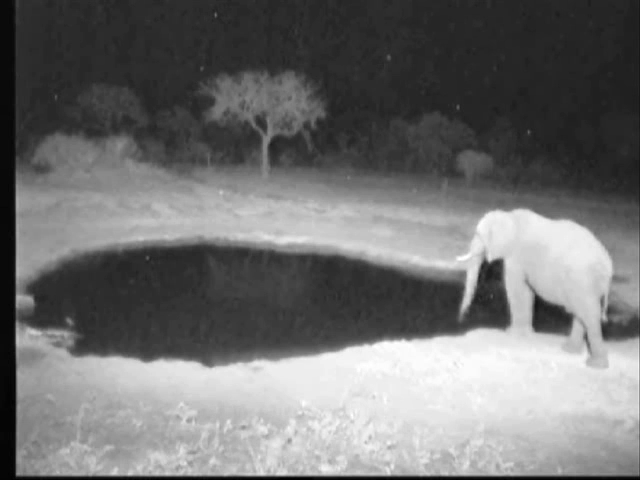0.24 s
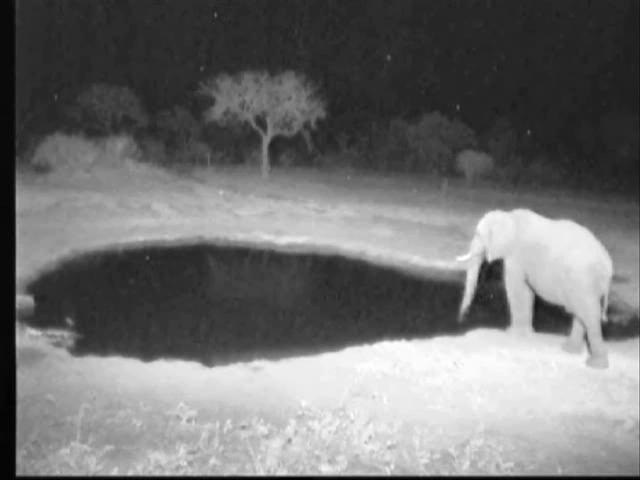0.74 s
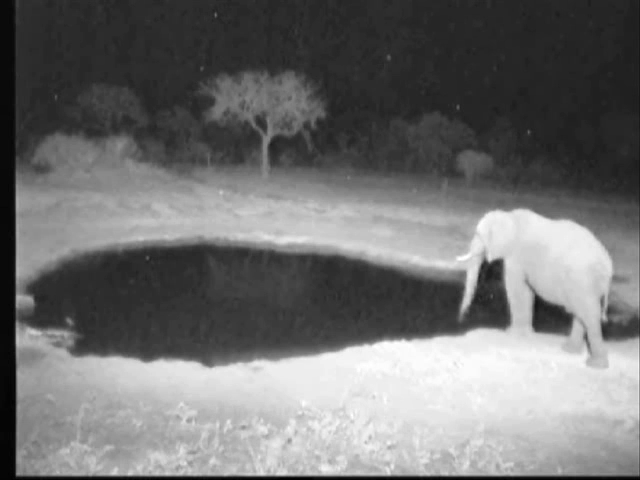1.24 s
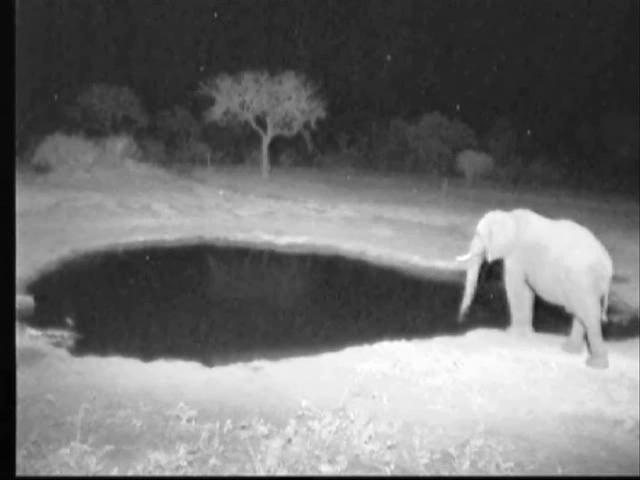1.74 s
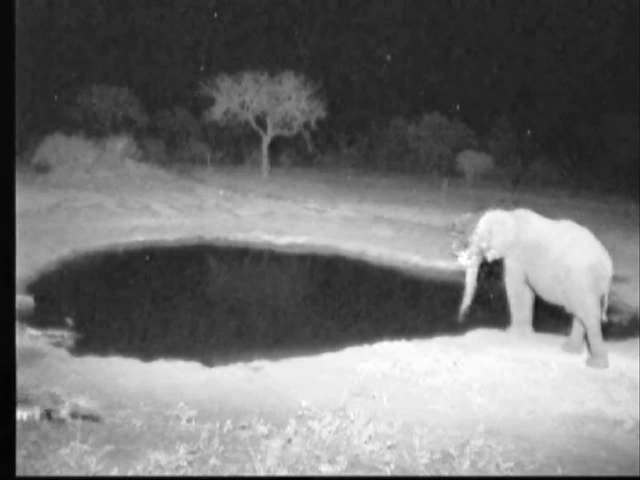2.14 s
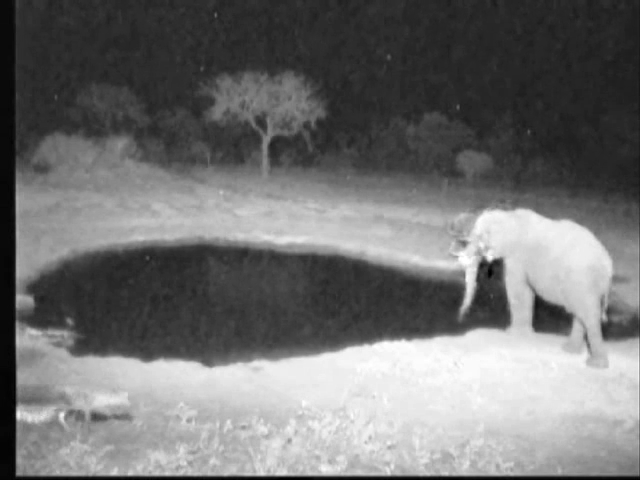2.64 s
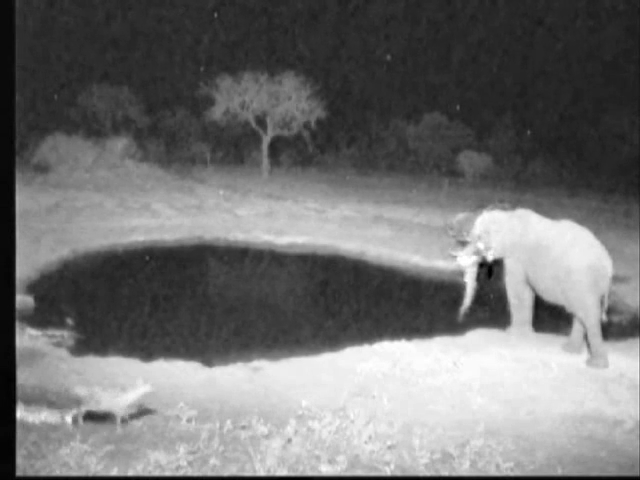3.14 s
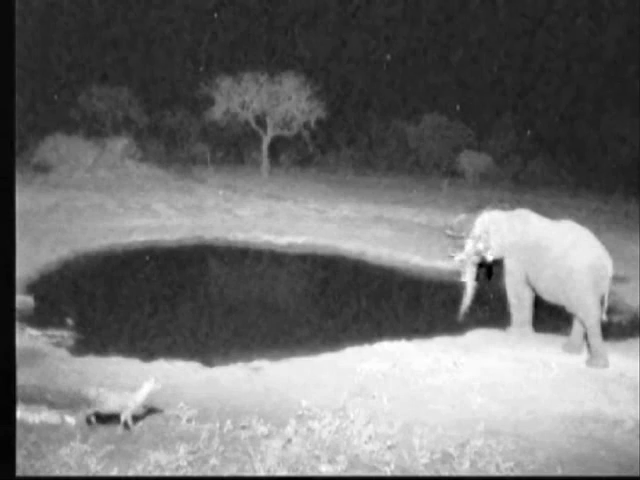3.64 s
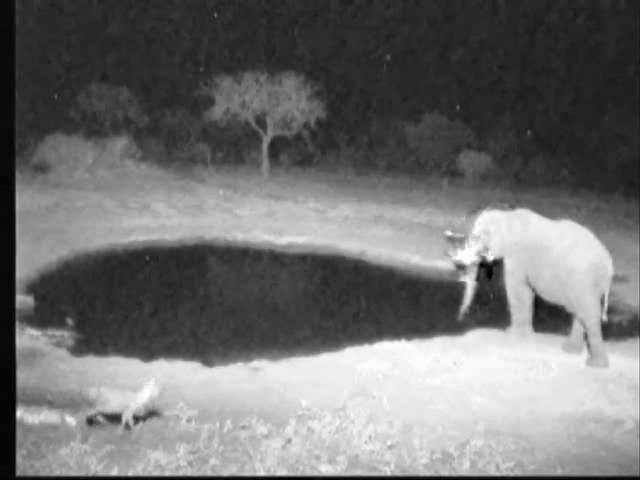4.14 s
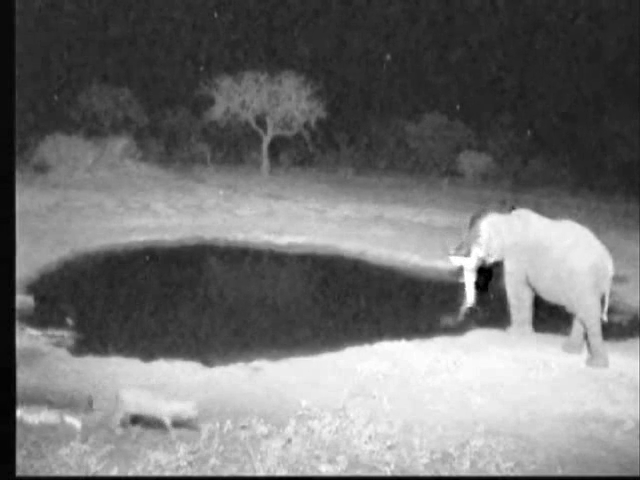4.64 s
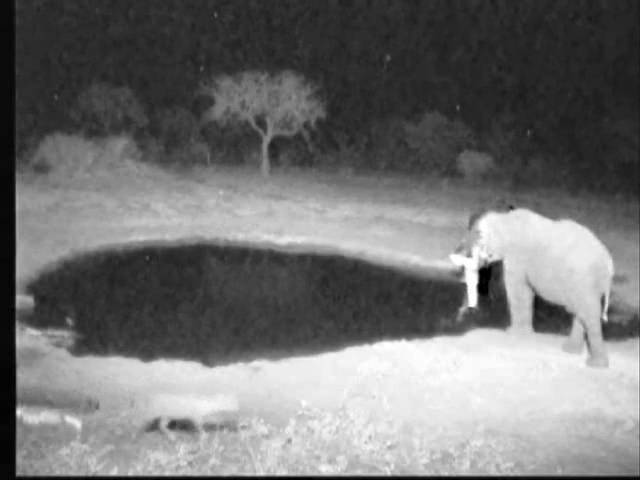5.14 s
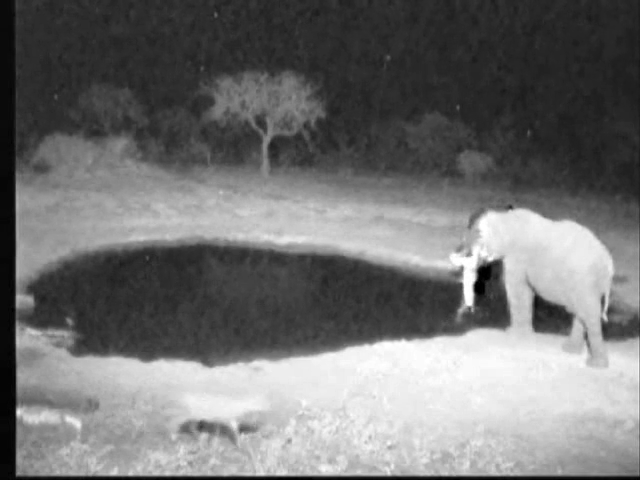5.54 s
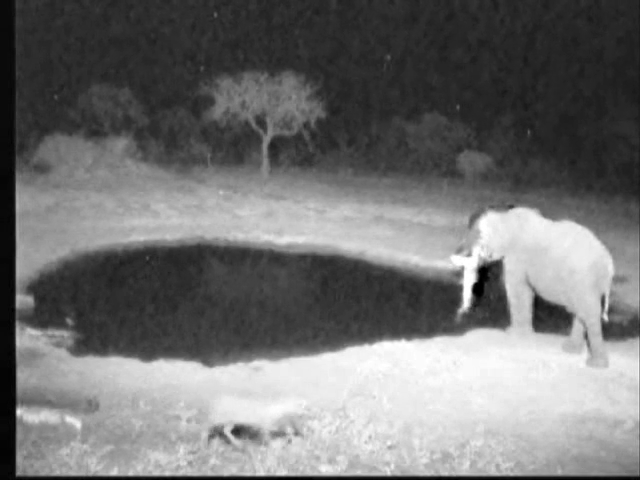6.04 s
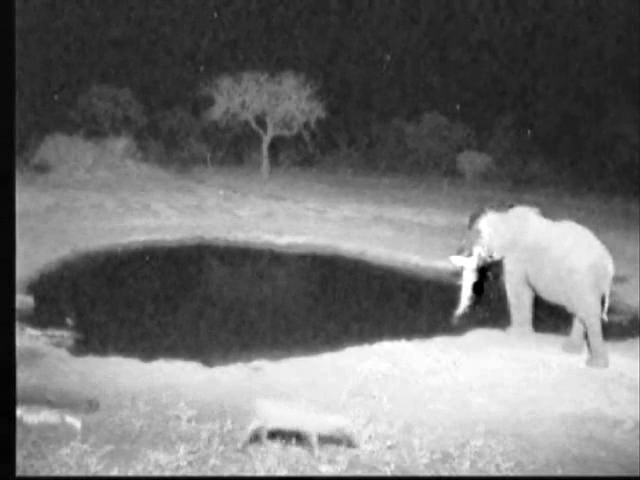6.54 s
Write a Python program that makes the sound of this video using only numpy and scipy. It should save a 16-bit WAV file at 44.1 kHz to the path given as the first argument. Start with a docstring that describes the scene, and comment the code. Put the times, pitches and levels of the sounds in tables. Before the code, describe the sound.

Over the hiss, mains hum and thin buzz of a mono outdoor microphone, water churns and bubbles in spurts through an elephant's trunk. Spilled water then slaps onto the waterhole, with small plinks and falling drops, growing sparser until it stops. The electrical noise remains, its high whine swelling slightly, and a tiny whistle sounds far off in the night bush.

```python
"""An elephant drinks at night

Water gushes and gurgles through an elephant's trunk for two seconds, then spills and slaps back
onto the waterhole in splashes that thin out and fade. Bubbles glug, and thrown-up drops patter down.
Near the end comes one faint whistle from the bush. An outdoor microphone sends it all down a narrow
mono line, with mains hum, a high whine, a thin buzz and hiss running underneath."""
import sys
import numpy as np
from scipy import signal
from scipy.fft import rfft, irfft
from scipy.io import wavfile
from scipy.ndimage import map_coordinates

SR = 44100
rng = np.random.default_rng(int(sys.argv[2]) if len(sys.argv) > 2 else 0)


def output_pcm(signal):
    """Save a mono or channel-first signal as 16-bit PCM at the path in sys.argv[1].

    Samples are clipped to [-1, 1] before scaling.
    """
    pcm = np.clip(np.atleast_2d(signal).T, -1, 1) * 32767
    wavfile.write(sys.argv[1], SR, np.round(pcm).astype(np.int16))


N = 299439
TIME = np.arange(N) / SR


def undb(db):
    """Turn decibels into a number to multiply by."""
    return 10 ** (np.asarray(db) / 20)


def unit(x):
    """Scale a sound so that its average level (rms) is 1."""
    return x / np.sqrt(np.mean(x ** 2) + 1e-18)


def curves(table):
    """Join a table's rows by straight lines in time, one curve for each level column."""
    times, *columns = np.transpose(table)
    return [np.interp(TIME, times, column) for column in columns]


def colour(x, points):
    """Shape a sound's tone by (Hz, dB) points; beyond the first and last it falls away."""
    hz, db = np.transpose(points)
    log_hz = np.log(np.fft.rfftfreq(len(x), 1 / SR) + 1)
    outside = np.abs(log_hz - np.clip(log_hz, np.log(hz[0]), np.log(hz[-1])))
    gain = undb(np.interp(log_hz, np.log(hz), db) - 49 * outside)
    return irfft(rfft(x) * gain, len(x))


def wander(per_second):
    """A smooth random wobble with a typical size of 1."""
    knots = rng.standard_normal(4096)
    return unit(map_coordinates(knots, [TIME * per_second], order=3, mode="wrap"))


MAINS_HZ = 50
# The hum's changing tones. Each row: time in seconds, then levels in dB at 50, 150 and 250 Hz.
HUM_LEVELS = [(0.0, -45.5, -39.5, -47.5), (1.6, -48, -40.5, -44.5), (3.4, -54, -44.5, -46.5),
              (4.7, -70, -41.5, -47), (6.0, -52, -39.5, -44), (6.79, -52, -40, -47)]
# The hum's steady tones. Each row: pitch in Hz, level in dB.
HUM_TONES = [(100, -52.5), (350, -53.5), (450, -61), (550, -65)]


def mains_hum():
    """Mains power hums at multiples of its own pitch; three low tones slowly sink and swell."""
    changing = list(zip((50, 150, 250), curves(HUM_LEVELS)))
    hum = sum(undb(db) * np.sin(2 * np.pi * (hz * TIME + rng.random()))
              for hz, db in changing + list(HUM_TONES))
    return np.sqrt(2) * hum


# The whine's loudness. Each row: time in seconds, level in dB.
WHINE_LEVELS = [(0, -64.5), (5.3, -64.5), (5.85, -59), (6.79, -55)]


def whine(hz=5040):
    """A thin electrical tone wavers and swells near the end."""
    db, = curves(WHINE_LEVELS)
    gain = np.sqrt(2) * undb(db + 3.3 * wander(6))
    return gain * np.sin(2 * np.pi * hz * TIME + 1.3 * wander(45))


# The tone of the buzz. Each row: frequency in Hz, level in dB.
BUZZ_COLOUR = [(200, -16), (600, -1.5), (1200, 1.5), (2000, -1.5), (3000, 3.5), (4000, -2.5), (5200, 7.5),
               (7000, -17.5)]


def buzz():
    """A rectifier ticks twice in each mains cycle; the wiring smears the two ticks differently."""
    t, period = np.arange(SR // 100) / SR, SR // MAINS_HZ
    out = 0
    for start in (0, period // 2):
        ticks = np.arange(N) % period == start
        smear = rng.standard_normal(len(t)) * np.exp(-t / 0.0021)
        out += signal.fftconvolve(ticks.astype(float), unit(smear))[:N]
    return undb(-47.5) * unit(colour(out, BUZZ_COLOUR))


# The tone of the hiss. Each row: frequency in Hz, level in dB.
HISS_COLOUR = [(25, -2), (60, 2.5), (200, 1.5), (390, 4), (560, 6.5), (840, 0), (1600, -4), (2450, -3),
               (3000, 0.3), (4200, 0), (5500, -0.1), (6700, 2.2), (7300, -19)]


def hiss():
    """The line hisses over the soft, low night air; the treble flickers in narrow strips."""
    spectrum = rfft(colour(rng.standard_normal(N), HISS_COLOUR))
    strip = np.fft.rfftfreq(N, 1 / SR) // 300  # each strip is 300 Hz wide
    out = irfft(spectrum * (strip < 8), N)  # the low strips stay steady
    for k in range(8, 25):
        out += irfft(spectrum * (strip == k), N) * undb(wander(12))
    return undb(-41) * unit(out)


# Gushes of water through the trunk. Each row: time of full flow in seconds, seconds held,
# swell in dB per second, level in dB, then froth and spray in dB compared with that level.
GUSHES = [(0.23, 0.015, 400, -41, -11, -14), (0.31, 0.068, 380, -31.5, -0.5, -5.5),
          (0.65, 0.037, 300, -27.5, 0, -3.5), (0.927, 0.035, 254, -22, 4, -1.5),
          (1.19, 0.14, 790, -31.5, -5, -10), (1.325, 0.059, 298, -30, -2, -8.5),
          (1.42, 0.082, 296, -28, 2, -0.5), (1.535, 0.042, 248, -22.5, -0.5, -4.5),
          (1.618, 0.013, 300, -24, 0.5, -1.5), (1.68, 0.13, 199, -32, -1, -10),
          (1.794, 0.06, 344, -25.5, -5.5, -4.5), (1.91, 0.079, 201, -30, -3, -7),
          (2.13, 0.028, 165, -24.5, -6, -17.5), (2.22, 0.039, 197, -38.5, -18, -9.5)]


def gushes(ebb_db_per_s=240, mist_fade_db_per_s=43):
    """Loudness curves for the trunk's body, froth and spray; fine mist lingers after each gush."""
    power = np.zeros((3, N))
    for full_at, hold, swell, db, froth_db, spray_db in GUSHES:
        rising_db = db - swell * np.maximum(full_at - TIME, 0)
        since_end = np.maximum(TIME - full_at - hold, 0)
        flow = undb(rising_db - ebb_db_per_s * since_end)
        mist = undb(rising_db - 9.5 - mist_fade_db_per_s * since_end)
        power += np.array([flow, undb(froth_db) * flow, undb(spray_db) * np.maximum(flow, mist)]) ** 2
    return np.sqrt(power)


def droplets(per_second, spread_db, size):
    """Tiny drops hit at random moments, some harder than others."""
    hits = rng.random(size) < per_second / SR
    signs = rng.choice([-1, 1], size)
    return unit(hits * signs * undb(spread_db * rng.standard_normal(size)))


def bubble(t, hz, cycles, rise):
    """A bubble rings and dies away; its pitch climbs as it nears the surface."""
    age = np.maximum(t, 0) * hz / cycles
    phase = 2 * np.pi * cycles * age * (1 + rise * np.minimum(age, 2))
    return np.sin(phase) * np.exp(-2 * age)


def gurgle(count, low_hz, high_hz, cycles):
    """A stream of bubbles, each with a random moment, pitch and strength."""
    t = np.arange(SR // 20) / SR
    out = np.zeros(N + len(t))
    for when, pitch, strength in rng.random((count, 3)):
        i, hz = int(when * N), low_hz * (high_hz / low_hz) ** pitch
        out[i:i + len(t)] += strength * bubble(t, hz, cycles, rise=0.064)
    return unit(out[:N])


def band(x, low_hz, high_hz):
    """Keep the sound between two frequencies and scale it to level 1."""
    return unit(signal.sosfilt(signal.butter(3, [low_hz, high_hz], "band", fs=SR, output="sos"), x))


def resonate(x, resonances):
    """Make a sound ring at several pitches at once, as a tube does."""
    return sum(undb(db) * signal.lfilter(*signal.iirpeak(hz, hz / width, fs=SR), x)
               for hz, width, db in resonances)


# Where the trunk and mouth ring: low (body), middle (froth) and high (spray).
# Each row: pitch in Hz, width in Hz, level in dB.
BODY_RESONANCES = [(563, 250, 3), (695, 230, -2), (940, 220, 0.5), (1230, 160, -12.5)]
FROTH_RESONANCES = [(1600, 520, -5.5), (2200, 310, -1.5), (2430, 610, 5), (3050, 380, -11)]
SPRAY_RESONANCES = [(3950, 560, 0), (5080, 480, -6), (5680, 520, -3.5), (6720, 560, -6)]


def trunk():
    """Churning water and bursting froth make the trunk ring, gush by gush."""
    body_gain, froth_gain, spray_gain = gushes()
    churn = droplets(per_second=1400, spread_db=1, size=N) + 0.87 * rng.standard_normal(N)
    churn *= undb(wander(110))  # the flow sputters
    body = unit(resonate(churn, BODY_RESONANCES))
    body += 0.5 * gurgle(count=800, low_hz=524.5, high_hz=1244, cycles=15)
    froth = unit(resonate(churn, FROTH_RESONANCES))
    froth += 0.41 * gurgle(count=1200, low_hz=2050, high_hz=2740, cycles=16)
    spray = resonate(churn, SPRAY_RESONANCES)
    return (undb(-0.86) * body_gain * band(body, 500, 1347)
            + undb(-2.03) * froth_gain * band(froth, 1290, 2940)
            + undb(-1.64) * spray_gain * band(spray, 3200, 6400))


def bank_echoes(water, fade_s, level_db):
    """The banks and bushes scatter the sound back as a faint blur of echoes."""
    t = np.arange(SR) / SR
    echoes = rng.standard_normal(SR) * undb(-60 * t / fade_s) * np.minimum(t / 0.0077, 1)
    return undb(level_db) * signal.fftconvolve(water, echoes / np.linalg.norm(echoes))[:N]


# Bubbles that stand out alone; the row at 1.625 s is a short ring as the flow surges. # Each row: start in
# seconds, pitch in Hz, peak level in dB.
BUBBLES = [(0.347, 597, -19.5), (1.555, 560, -22), (1.625, 1505, -17), (1.793, 560, -17.5),
           (1.848, 736, -17), (2.142, 599, -17.5), (2.18, 578, -24), (3.145, 2330, -22.5),
           (3.17, 2180, -24), (3.202, 2320, -24), (3.227, 2400, -24), (3.398, 2200, -27), (3.646, 768, -25),
           (3.647, 2094, -19.5), (3.65, 4720, -23), (3.79, 550, -22.5), (3.96, 3270, -25),
           (4.105, 5630, -24), (4.306, 4600, -21)]


def glugs():
    """Single bubbles ring out as low glugs and high plinks."""
    out, t = np.zeros(N + SR), np.arange(SR // 5) / SR
    for start, hz, db in BUBBLES:
        cycles = 16 * (hz / 1000) ** 0.41  # smaller, higher bubbles ring for more cycles
        fade_in = np.minimum(t * hz, 1)
        i = int(start * SR)
        out[i:i + len(t)] += undb(db) * fade_in * bubble(t, hz, cycles, rise=0.0025)
    return out[:N]


# The tones of a splash's low air pocket, middle splatter and high spray.
# Each row: frequency in Hz, level in dB.
POCKET_COLOUR = [(300, -32.5), (430, -9.5), (570, 2), (850, 2.5), (1200, -6), (1600, -30)]
SPLATTER_COLOUR = [(1100, -25), (1650, -17.5), (2050, -3.5), (2350, -4), (2750, -7), (3500, -15)]
SPRAY_COLOUR = [(2200, -44), (3000, -2), (3500, 2), (4800, 8), (5700, -2), (6700, 7.5), (7400, -14.5)]


def splash(length, pocket_db, splatter_db, spray_db, bubble_hz):
    """A lump of water lands: an air pocket plops, drops splatter and small bubbles ring in the spray."""
    t = np.arange(SR // 5) / SR - 0.01  # the water lands 0.01 seconds in
    landing = np.clip(t / (0.3 * length), 0, 1) * np.exp(-np.maximum(t - length, 0) / 0.0011)
    impacts = droplets(per_second=4000, spread_db=4.5, size=len(t))
    drops = landing * (impacts + 0.5 * rng.standard_normal(len(t)))
    drops[int((0.01 + length / 2) * SR)] += 8  # the bulk of the water smacks down
    births = rng.random(6) * length
    pitches = bubble_hz * (1 + 0.035 * rng.standard_normal(6))
    rings = sum(bubble(t - birth, hz, cycles=28, rise=0.015) for birth, hz in zip(births, pitches))
    spray = unit(colour(drops, SPRAY_COLOUR)) + 0.81 * unit(rings)
    sound = (undb(pocket_db + 0.6) * unit(colour(drops, POCKET_COLOUR))
             + undb(splatter_db - 1.5) * unit(colour(drops, SPLATTER_COLOUR))
             + undb(spray_db - 2) * unit(spray))
    return sound * np.sqrt(length * SR / len(t))  # levels hold over the length of the landing


# Water hitting the pond. Each row: start in seconds, length in seconds, level in dB,
# air pocket in dB compared with that level, bubble pitch in Hz.
SPLASHES = [(0.523, 0.013, -29, 11, 4030), (0.546, 0.0028, -16.5, -6.5, 4000),
            (0.583, 0.018, -36, -7.5, 6700), (0.643, 0.0028, -29, 7, 3830), (0.784, 0.019, -24.5, -1, 4500),
            (0.804, 0.0069, -15.5, -7, 5670), (0.825, 0.017, -29, -2.5, 5940),
            (1.046, 0.0036, -22, -21, 4660), (1.309, 0.0069, -26, -2, 4000), (2.276, 0.014, -35, -14, 5220),
            (2.582, 0.0095, -23.5, -26, 5600), (2.592, 0.013, -17.5, -27, 5480),
            (2.645, 0.013, -37, -14, 4820), (2.715, 0.011, -29, -24, 3540), (2.816, 0.0073, -16, -27, 5100),
            (2.825, 0.014, -26, -21.5, 4100), (3.064, 0.0037, -29.5, -14, 5340),
            (3.092, 0.0021, -20.5, -20, 5230), (3.137, 0.0073, -26, -15, 5000),
            (3.154, 0.0025, -20, -20, 6630), (3.163, 0.0097, -22.5, -19.5, 5100),
            (3.187, 0.049, -30.5, -19, 6280), (3.393, 0.025, -34, -8.5, 6530),
            (3.473, 0.0024, -27, -13, 4500), (3.503, 0.0037, -22.5, -17, 6680),
            (3.536, 0.014, -28.5, -12.5, 3600), (3.552, 0.0086, -24, -11, 4640),
            (3.643, 0.0068, -15.5, -24, 4830), (3.747, 0.025, -32, -13, 3770),
            (3.786, 0.013, -20, -6.5, 4320), (3.801, 0.016, -24, -11, 3370),
            (3.957, 0.014, -35.5, -19, 3350), (4.098, 0.033, -31, -14, 5630),
            (4.193, 0.0099, -32.5, -25, 3280), (4.295, 0.024, -33, -15.5, 4530),
            (4.679, 0.046, -43.5, -7.5, 4180), (5.056, 0.036, -43.5, -6, 4720)]


def spills():
    """Spilled water slaps onto the pond; deeper splashes splatter more, up to a limit."""
    out = np.zeros(N + SR)
    for start, length, db, pocket_db, hz in SPLASHES:
        splatter_db = min(pocket_db + 4, 0)
        sound = splash(length, db + pocket_db, db + splatter_db, db, hz)
        i = int(start * SR) - SR // 100
        out[i:i + len(sound)] += sound
    return out[:N]


def patter(fade_db_per_s=65):
    """Drops thrown up by each splash rain back and fade; a longer splash throws up more."""
    thrown = np.zeros(N)
    for start, length, db, _, _ in SPLASHES:
        thrown[int((start + length) * SR)] += length / 0.01 * undb(db) ** 2
    power = signal.lfilter([1], [1, -undb(-fade_db_per_s / SR) ** 2], thrown)
    drops = droplets(per_second=2500, spread_db=1, size=N)
    rain = (unit(colour(drops, SPRAY_COLOUR))
            + undb(-7.5) * unit(colour(drops, SPLATTER_COLOUR))
            + undb(-13.5) * unit(colour(drops, POCKET_COLOUR)))
    return undb(-20) * np.sqrt(power) * rain


def whistle(start_s, length_s, from_hz, to_hz, db):
    """A very faint, wavering whistle slides in pitch far out in the bush."""
    progress = np.clip((TIME - start_s) / length_s, 0, 1)
    hz = from_hz + (to_hz - from_hz) * progress + 110 * wander(160)
    return undb(db) * np.sin(np.pi * progress) * np.sin(2 * np.pi * np.cumsum(hz) / SR)


def scene():
    """The water, its echoes, the night and the electrical noise, the same in both channels."""
    water = trunk() + glugs() + spills() + patter()
    night = hiss() + whistle(start_s=6.32, length_s=0.22, from_hz=3150, to_hz=2860, db=-46)
    echoes = bank_echoes(water, fade_s=0.25, level_db=-8.5)
    mono = water + echoes + night + mains_hum() + whine() + buzz()
    return np.array([mono, mono])


def record(dry):
    """The narrow line cuts off the treble above 7130 Hz."""
    return signal.sosfilt(signal.ellip(10, 0.2, 75, 7130, fs=SR, output="sos"), dry)


dry = scene()
out = record(dry)
output_pcm(out)
```